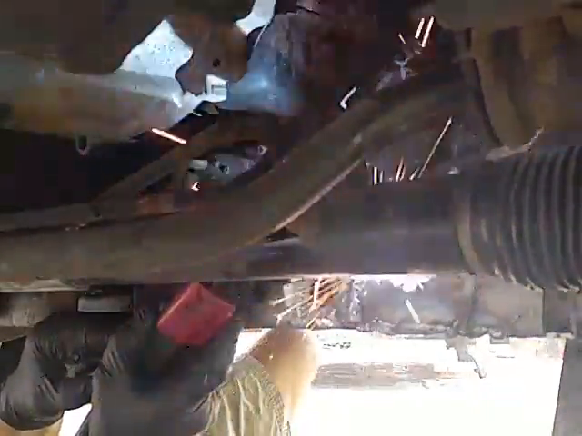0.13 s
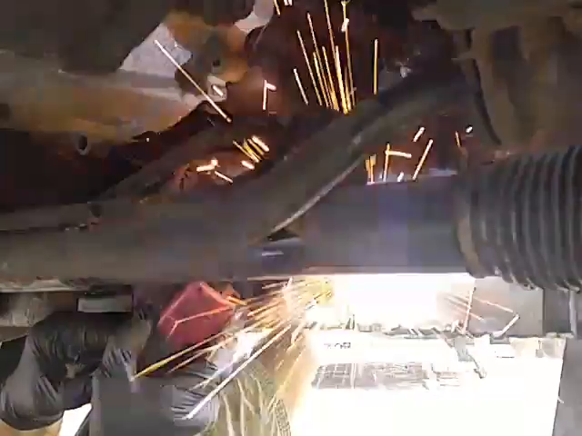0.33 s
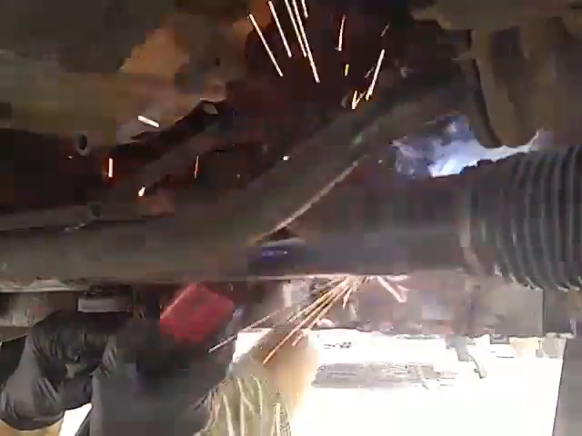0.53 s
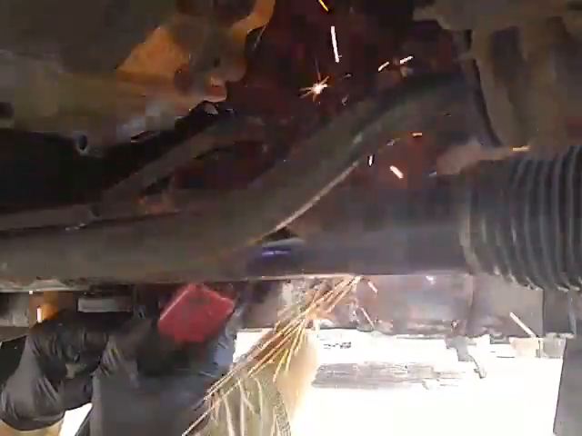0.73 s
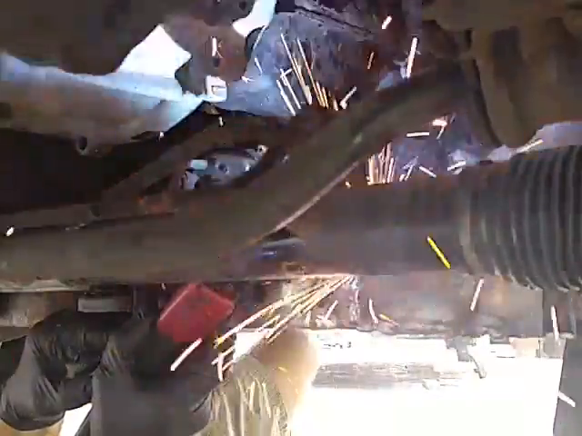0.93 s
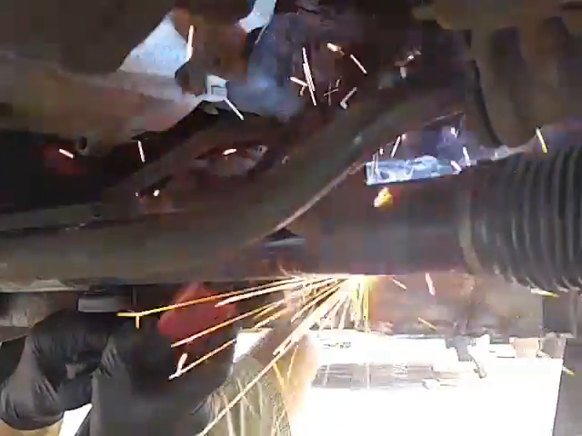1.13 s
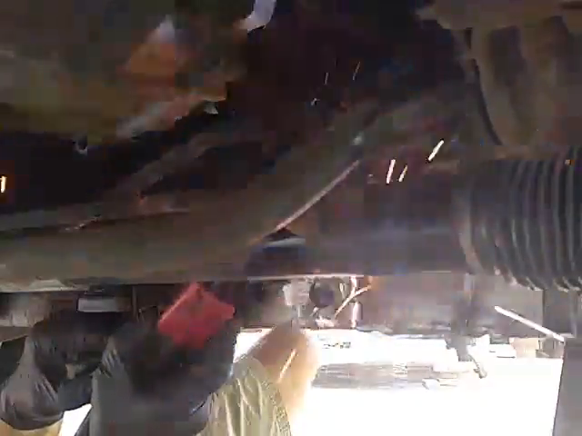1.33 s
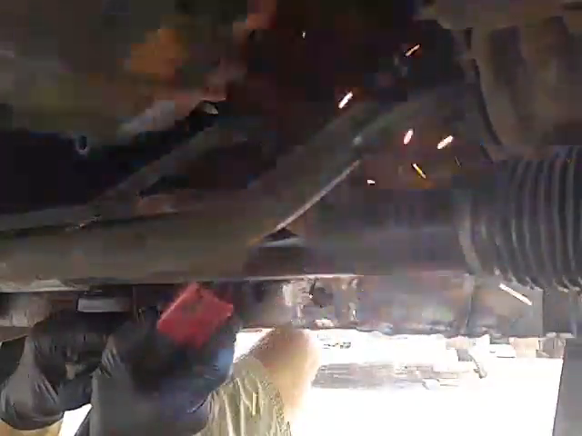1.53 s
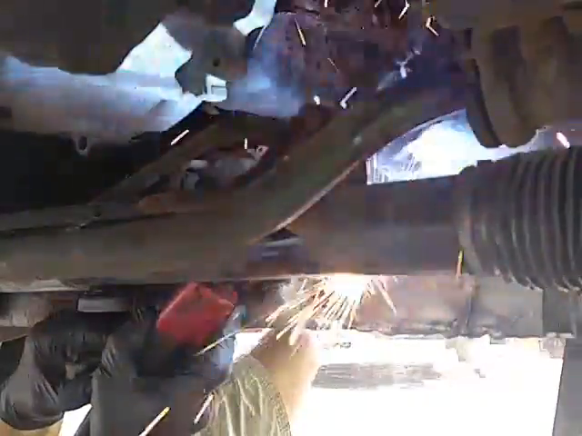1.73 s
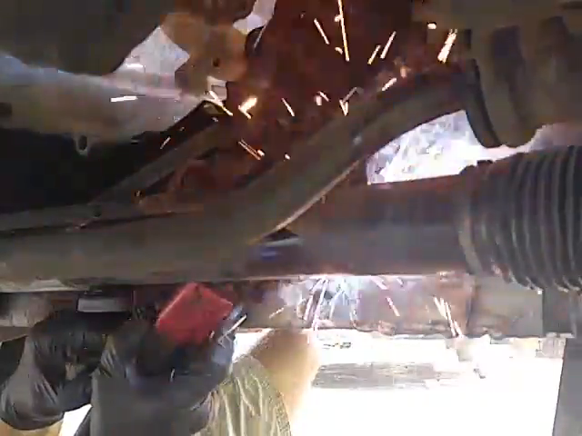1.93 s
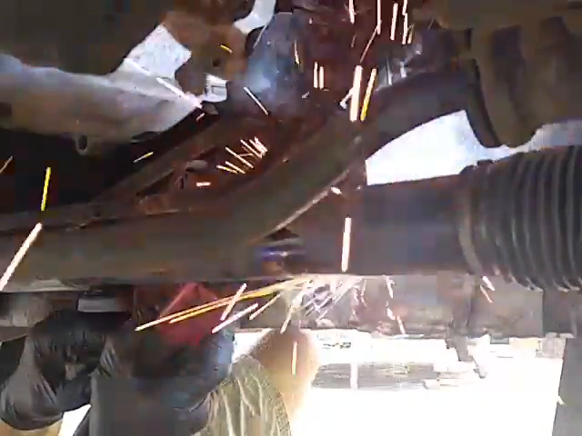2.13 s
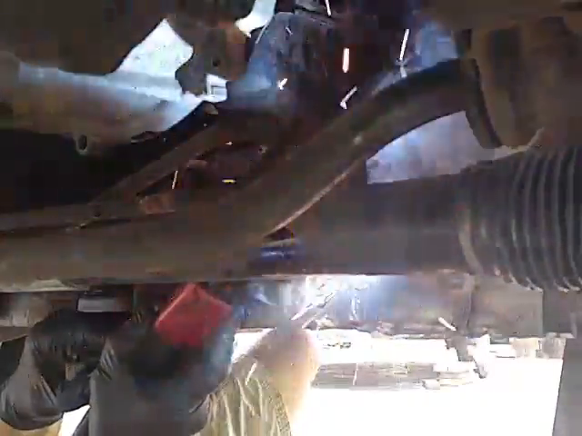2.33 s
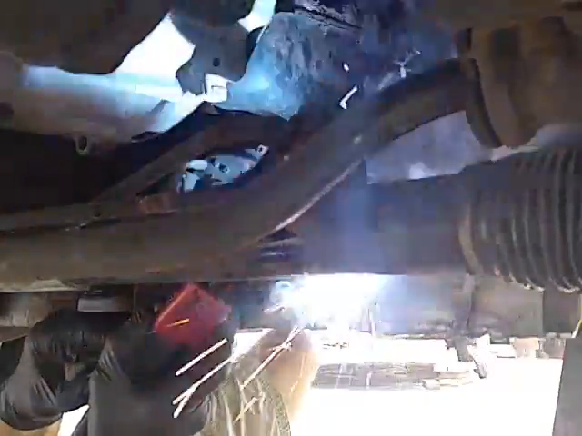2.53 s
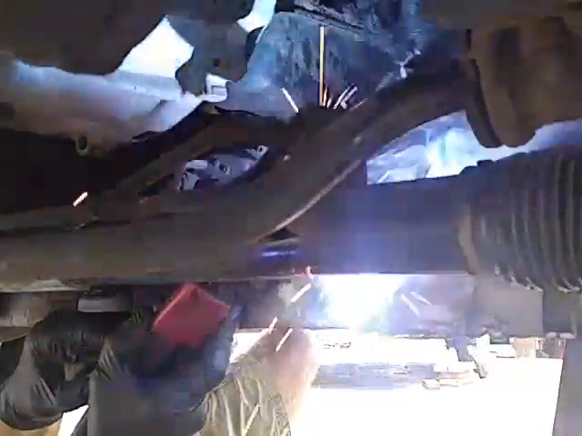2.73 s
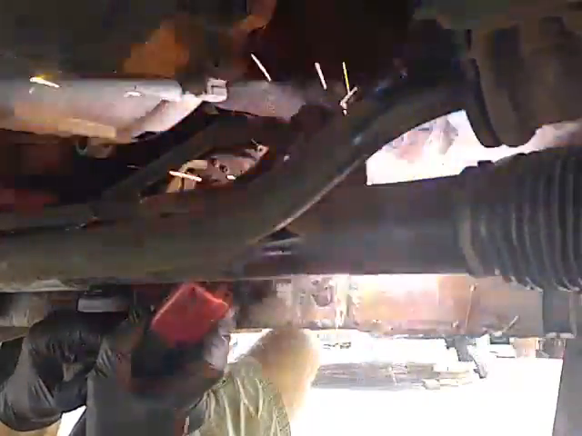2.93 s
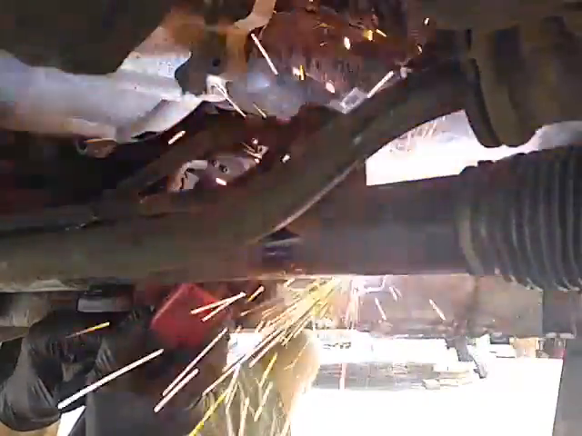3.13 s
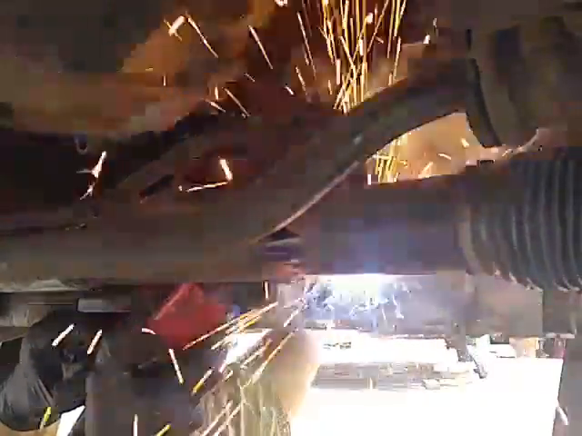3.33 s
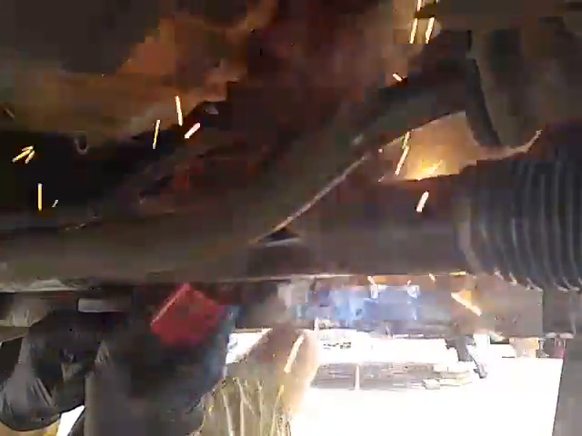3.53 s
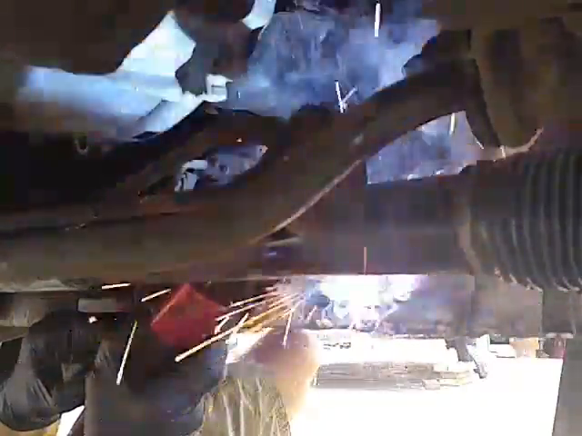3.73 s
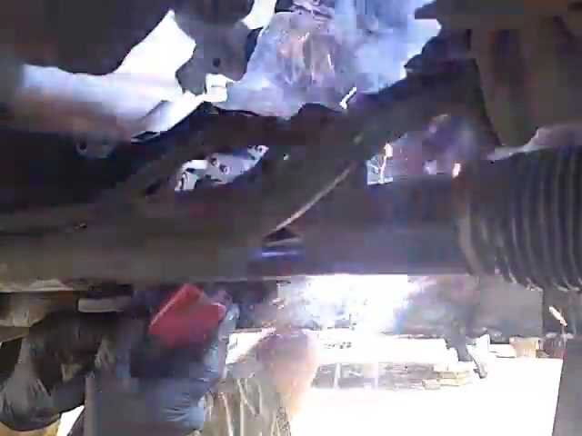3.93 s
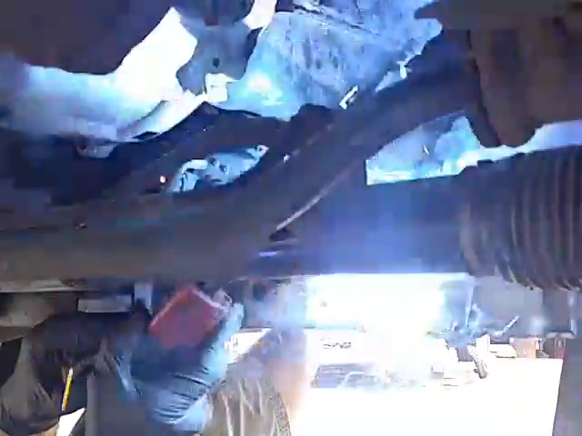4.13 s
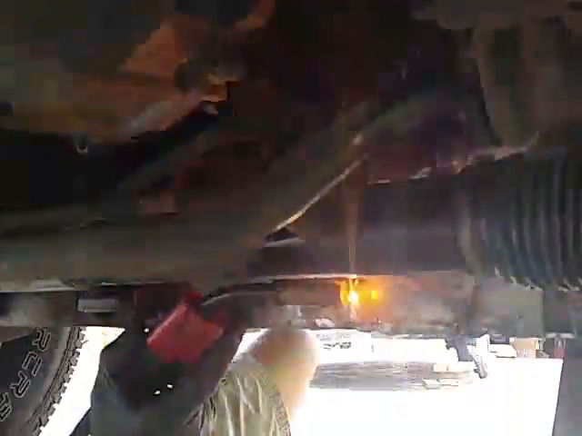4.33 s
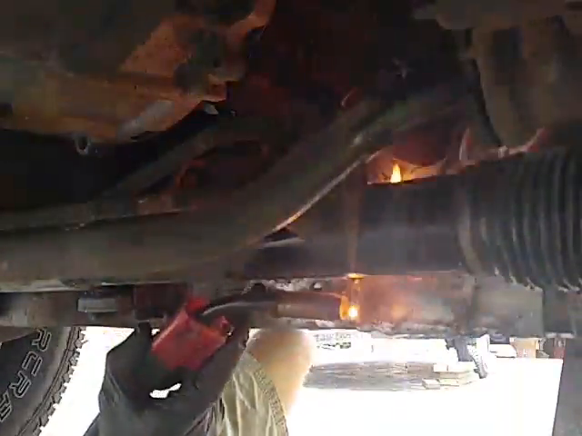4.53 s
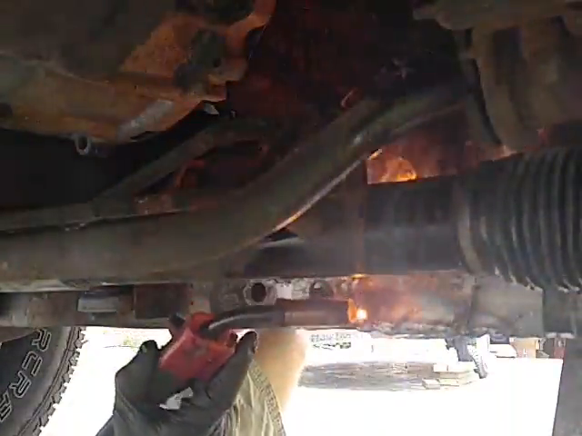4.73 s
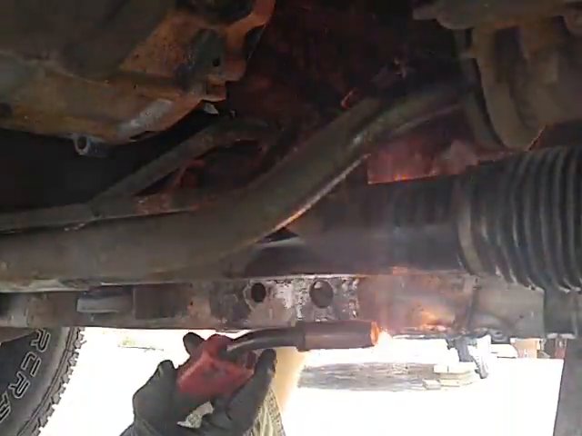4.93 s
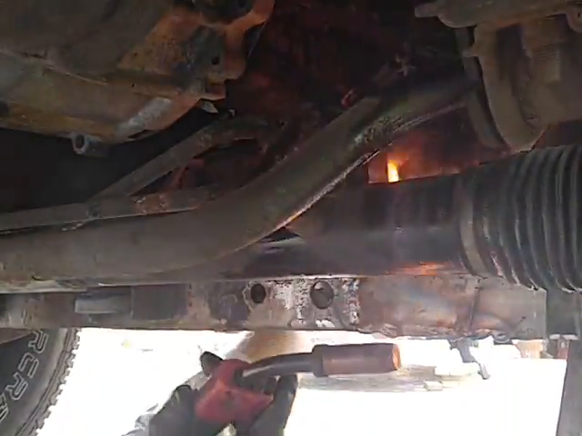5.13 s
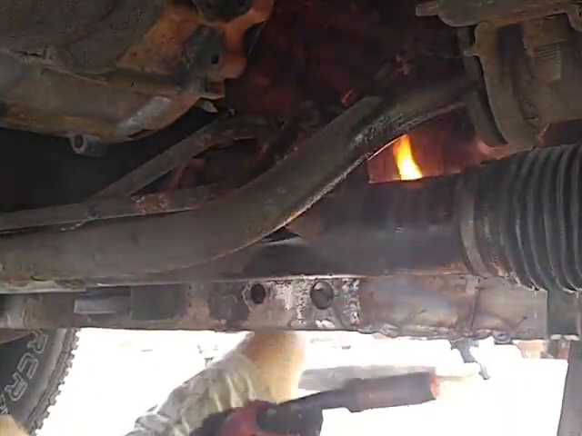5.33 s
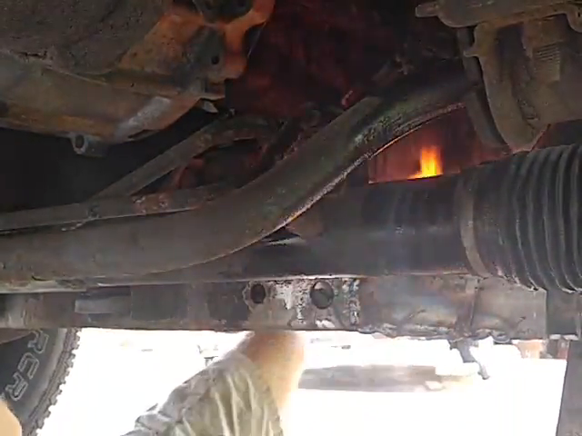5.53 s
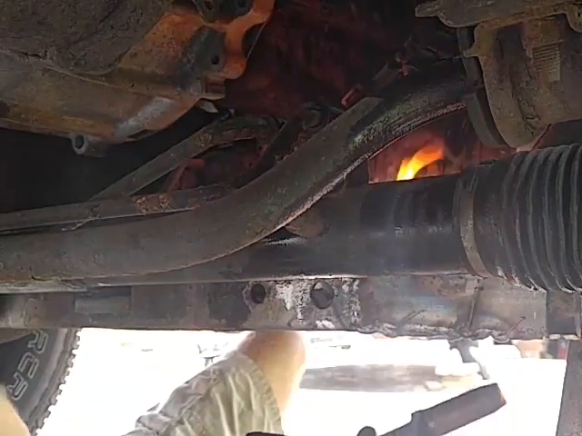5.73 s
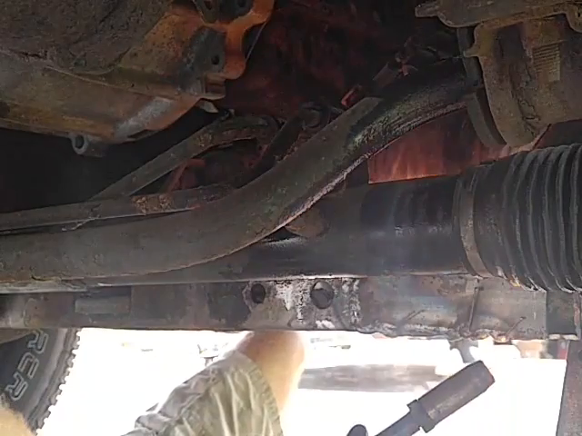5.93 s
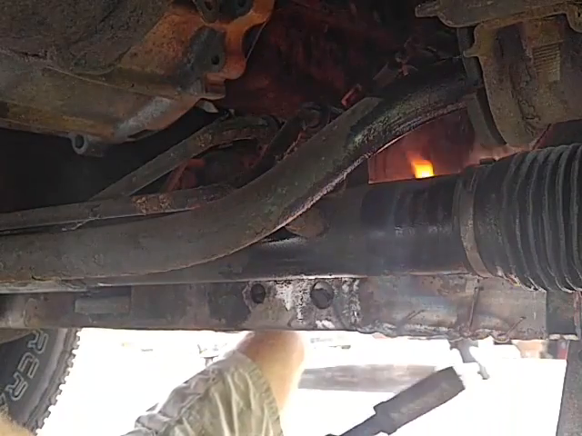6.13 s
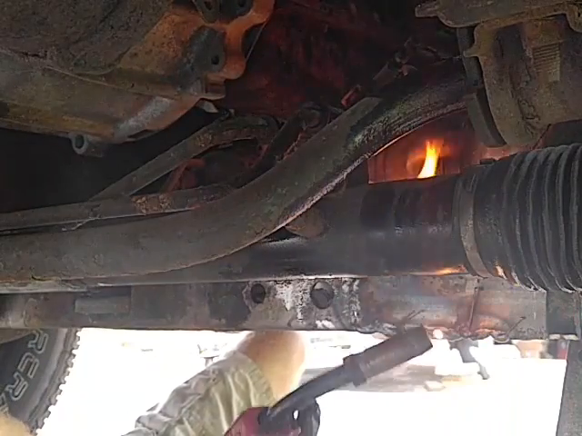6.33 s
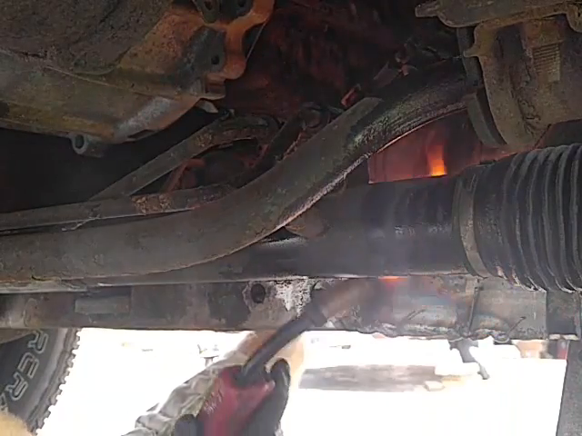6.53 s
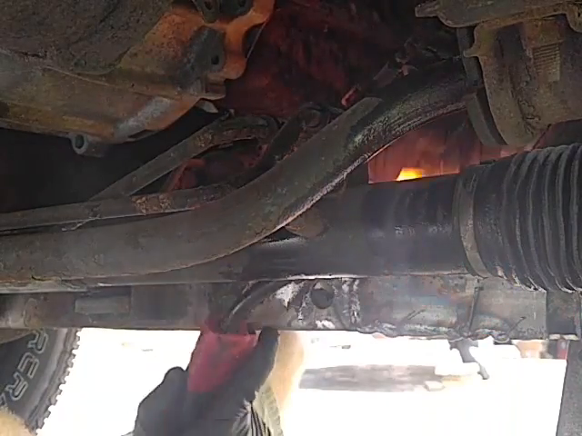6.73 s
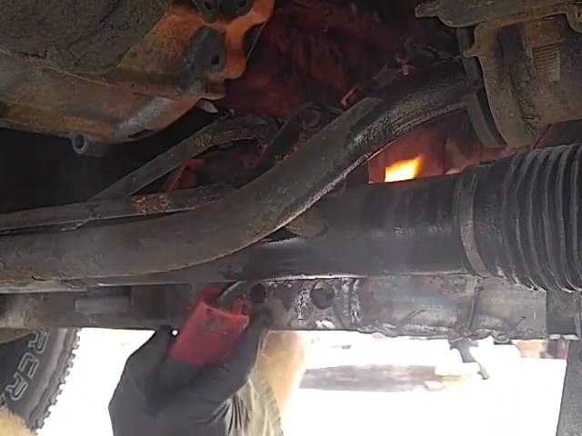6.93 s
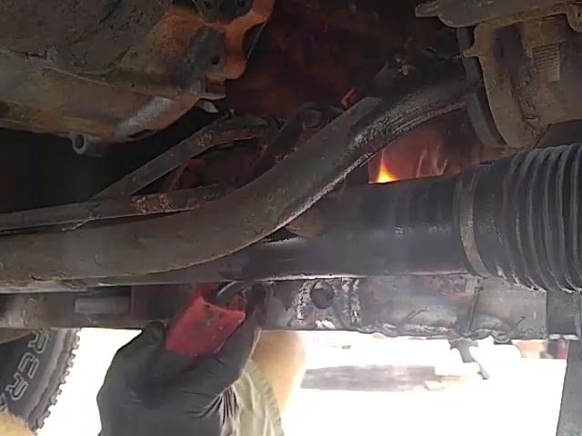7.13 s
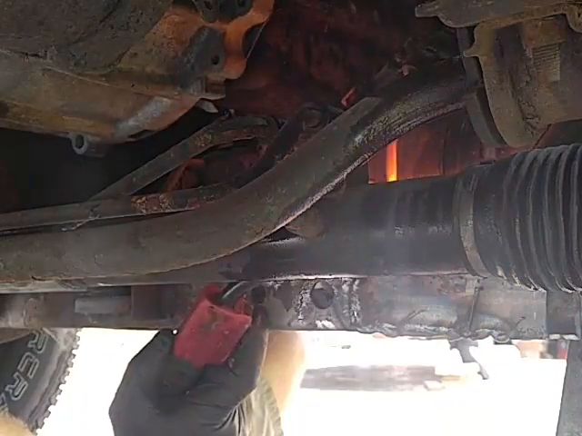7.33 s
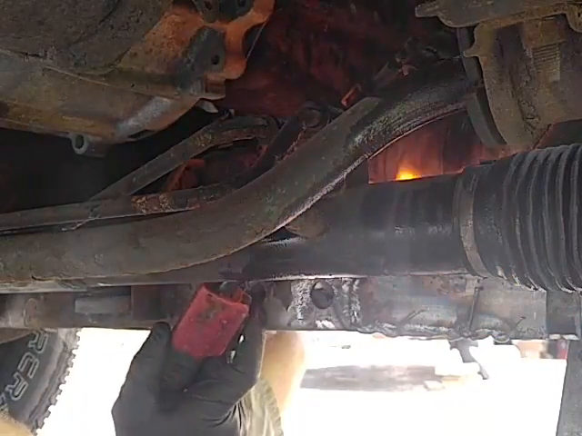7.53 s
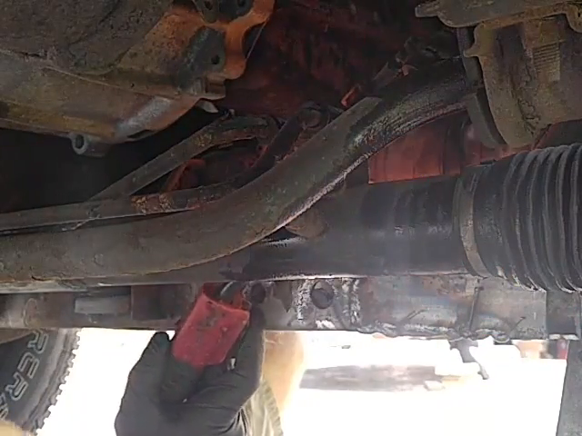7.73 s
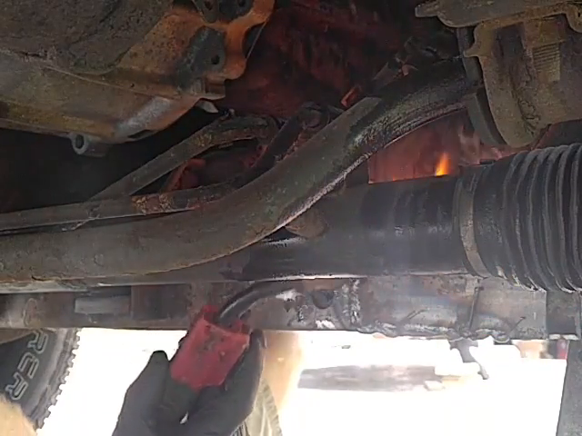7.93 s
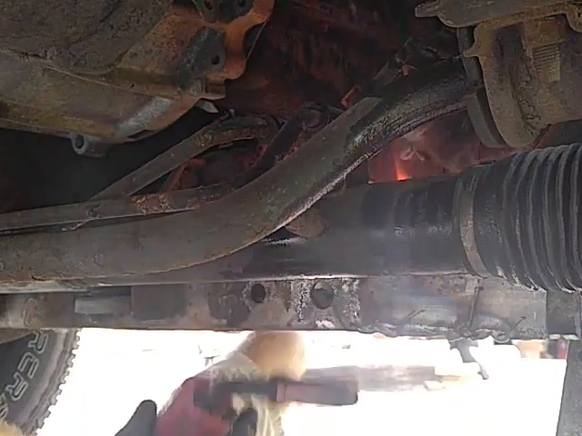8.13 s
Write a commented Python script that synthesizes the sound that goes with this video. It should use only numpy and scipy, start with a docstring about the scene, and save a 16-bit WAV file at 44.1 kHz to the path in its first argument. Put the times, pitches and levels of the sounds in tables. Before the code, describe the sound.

Loud, uneven welding comes first: bright cracks, hollow pops and bursts of sizzle, close to the microphone beneath a truck in a workshop. After roughly four seconds the welding stops and it becomes much quieter. A steady fan hum and soft low rumble remain, with occasional small clicks from the torch being moved and short, faint rustles of gloves and clothing.

```python
"""A MIG welder runs a four-second bead on a steel truck frame, heard from under the truck.
The wire shorts into the pool and blows free: even frying cracks when it feeds well, loud pops when
it stubs, a hiss when the arc burns open. Each crack is a bright snap, a hollow blast and a thump.
Then the arc stops; the welder's fan hums on over the rumble of the shop, while gloves and sleeves
rustle and the torch ticks as it is moved."""
import sys
import numpy as np
from scipy import signal
from scipy.fft import rfft, irfft
from scipy.io import wavfile
from scipy.ndimage import uniform_filter1d

SR = 44100
rng = np.random.default_rng(int(sys.argv[2]) if len(sys.argv) > 2 else 0)


def log_audio(samples):
    """Write samples as a 16-bit WAV file to the path given in sys.argv[1]."""
    # one column per channel
    frames = np.atleast_2d(samples).T
    # limit to full scale, then quantise
    limited = np.clip(frames, -1, 1)
    pcm = np.round(limited * 32767).astype(np.int16)
    wavfile.write(sys.argv[1], SR, pcm)


N = 360738
T = np.arange(N) / SR

# colour of the hollows of the frame: f/Hz, level/dB
HOLLOWS = [(100, -1.5), (250, 1), (400, -3), (520, -5.5), (700, -14.5), (880, -4.5), (1200, -9.5),
           (1500, 0), (1900, -8.5), (2800, -10), (5000, -6.5), (10000, -41)]


def amp(db):
    """Decibels to gain."""
    return 10 ** (np.asarray(db) / 20)


def unit_rms(x):
    """Scales to an rms of one."""
    return x / np.sqrt(np.mean(x ** 2) + 1e-20)


def curve(rows, column=1):
    """One column of a breakpoint curve, at every sample."""
    rows = np.array(rows)
    return np.interp(T, rows[:, 0], rows[:, column])


def spells(rows, attack_s, release_s):
    """Envelope of separate spells, each an attack, a hold and a release."""
    return sum(amp(db) * np.clip(np.minimum((T - s) / attack_s, (s + length - T) / release_s), 0, 1)
               for s, length, db in rows)


def add(mix, s, sound):
    """Mixes a sound in at time s."""
    part = mix[max(round(s * SR), 0):][:len(sound)]
    part += sound[:len(part)]


def drift(hz):
    """Random wander of rms one, with changes up to about hz."""
    knots = np.linspace(0, T[-1], int(2 * hz * T[-1]) + 2)
    return unit_rms(np.interp(T, knots, rng.standard_normal(len(knots))))


def colour(x, points, resonances=(), size=8192):
    """Minimum-phase EQ of unit energy from a spectrum and its resonances."""
    hz = np.fft.rfftfreq(size, 1 / SR)
    point_hz, point_db = np.transpose(points)
    gain = amp(np.interp(np.log(hz + 1), np.log(point_hz), point_db))
    for centre, width, lift_db in resonances:
        gain *= 1 + (amp(lift_db) - 1) / (1 + (2 * (hz - centre) / width) ** 2)
    log_gain = np.log(np.r_[gain, gain[-2:0:-1]])
    taps = np.fft.ifft(np.exp(np.conj(signal.hilbert(log_gain)))).real[:size // 2]
    return signal.oaconvolve(x, taps / np.linalg.norm(taps))[:N]


def scatter(size):
    """Dense reflections with a flat overall spectrum."""
    return unit_rms(irfft(np.exp(2j * np.pi * rng.random(size // 2 + 1)), size))


def grains(per_s, spread_db, hiss_db):
    """Tiny clicks of uneven size over a smooth hiss."""
    clicks = (rng.random(N) < per_s / SR) * rng.choice([-1, 1], N)
    sizes = amp(spread_db * np.minimum(rng.exponential(1, N), 4))
    return unit_rms(unit_rms(clicks * sizes) + amp(hiss_db) * rng.standard_normal(N))


def arc():
    """The wire shorts and blows free; snaps and sizzle ring the same steel, over blasts and thumps."""
    # separate pops of the stubbing wire: t/s, snap/dB, blast/dB, thump/dB
    pops = [(0.0097, -14.5, -21.5, -21), (0.086, -5, -16.5, -22), (0.1079, -2, -10.5, -19),
            (0.141, -4, -15.5, -18), (0.167, -4.5, -11, -18.5), (0.1865, -12.5, -20.5, -16),
            (0.2193, -8, -30.5, -44.5), (0.2407, -2.5, -8, -19.5), (0.2714, -4.5, -11, -14.5),
            (0.2951, -9, -24, -16), (0.3157, -4, -11.5, -24.5), (0.3907, -4.5, -14, -23.5),
            (0.486, -14.5, -48.5, -59.5), (0.5685, -3, -12.5, -16.5), (0.603, -3.5, -7.5, -21),
            (0.6419, -6.5, -16, -17.5), (0.6996, -4, -12, -16.5), (0.7674, -9, -37, -56),
            (0.7984, -7.5, -40.5, -50), (0.8581, -1.5, -12, -27), (0.906, -4, -18, -26.5),
            (0.9977, -7, -19.5, -36), (1.0286, 3, -7.5, -14), (1.064, -10, -16.5, -18.5),
            (1.1283, -13.5, -39, -53), (1.1692, -3, -18, -19), (1.1898, -8, -16, -21.5),
            (1.2487, -9, -24.5, -38), (1.2765, -5, -25, -23), (1.291, -8.5, -25, -50),
            (1.3327, -3, -16, -19.5), (1.39, -6, -27, -46), (1.447, -4, -8, -23.5),
            (1.4978, -10, -26, -27.5), (1.549, 0, -4, -25.5), (1.5915, -2.5, -8.5, -16),
            (1.6342, -13.5, -38, -57), (1.6599, -8, -33.5, -28.5), (1.7663, -13, -30.5, -52),
            (1.7915, -21, -45, -60), (1.8061, -10, -46, -55), (1.8315, -14, -50, -56.5),
            (1.8412, -5.5, -18, -16), (1.9395, -11, -46.5, -53.5), (2.0912, -6, -26.5, -18.5),
            (2.3171, -6, -32, -39.5), (2.3377, -5.5, -22, -15.5), (2.475, -6.5, -28, -43),
            (2.504, -8, -30, -25.5), (2.5188, -3.5, -18.5, -43), (2.5421, -6, -13.5, -28),
            (2.6148, -10.5, -30, -48), (2.7303, -9.5, -35, -60.5), (2.7833, -8.5, -34.5, -57.5),
            (2.8339, 3.5, -2.5, -14), (2.9268, -6, -34.5, -49), (2.9834, -4.5, -14, -23),
            (3.0069, -13, -28.5, -46.5), (3.0322, 1, -8.5, -12.5), (3.1084, -4.5, -13, -17),
            (3.1319, 1, -9, -36), (3.2011, 1, -5, -17.5), (3.24, -18, -24.5, -51.5),
            (3.3772, -6, -26.5, -43.5), (3.446, -3.5, -11, -18), (3.5427, -10.5, -12, -43.5),
            (3.5936, -3.5, -9.5, -21), (3.6232, -6.5, -13.5, -33.5), (3.7064, -3.5, -12.5, -32),
            (3.7446, -11, -31.5, -52.5), (3.8951, -4, -23, -43), (3.9653, 0, -9, -17)]
    # colour of the snap: f/Hz, level/dB
    snap_eq = [(300, -35), (1000, -10.5), (2200, -12), (3500, -14), (4700, -9), (5700, -6), (6400, -1.5),
               (8500, -2.5), (10300, -1), (11300, -4.5), (13500, -1.5), (15800, -7.5)]
    # resonances of the gas nozzle and the steel around the arc: f/Hz, width/Hz, lift/dB
    steel_modes = [(2157, 140, 5.5), (3000, 290, 6.5), (3890, 85, 7), (4200, 93, 2.5), (4850, 63, 8),
                   (5120, 210, 6), (6295, 190, 6), (6560, 70, 0), (7310, 120, 4), (8140, 260, 5),
                   (8700, 63, 3.5), (8844, 120, 5.5), (9250, 38, 6.5), (10140, 450, 6.5), (10940, 81, 7),
                   (11830, 150, 6)]
    cracks = list(pops) + frying()
    hiss = sizzle(cracks)
    sputter = amp(-11) * colour(hiss, HOLLOWS)
    crackle = colour(snaps(cracks) + hiss, snap_eq, steel_modes)
    return workshop(crackle + sputter + blasts(cracks)) + thumps(cracks)


def snaps(cracks, shared=0.63, front_hz=7600, near_t60=0.038, tail_t60=0.091, size=4096):
    """Each snap takes the same paths among the steel parts, altered a little as the pool moves."""
    t, out = np.arange(size) / SR, np.zeros(N)
    front, near, tail = rng.standard_normal((len(cracks) + 1, 3, size)).swapaxes(0, 1)
    # a sharp front rings the nozzle; bright near echoes follow, then a duller tail
    front = unit_rms(signal.lfilter(*signal.iirpeak(front_hz, Q=2, fs=SR), front))
    front *= amp(2) * np.exp(-t / 0.001)
    tail = signal.lfilter(*signal.butter(2, 10500, fs=SR), tail)
    bursts = front + near * amp(-60 * t / near_t60) + tail * amp(-11 - 60 * t / tail_t60)
    # the first burst gives the shared paths, levelled to favour no broad band
    spectra = rfft(bursts)
    power = abs(spectra) ** 2
    paths = irfft(spectra[0] * np.sqrt(power.mean(axis=0) / uniform_filter1d(power[0], size=30)))
    paths *= np.minimum(2 * (1 - t / t[-1]), 1) ** 2  # the last echoes fade to nothing
    for (s, db, _, _), own in zip(cracks, bursts[1:]):
        add(out, s, amp(db) * (np.sqrt(shared) * paths + np.sqrt(1 - shared) * own))
    return out


def blasts(cracks, start_hz=1450, end_hz=420, glide_s=0.002577, knock_s=0.0033, size=4096):
    """The burst of metal vapour gives a knock that falls in pitch and echoes in the frame's hollows."""
    t, knocks, echoes = np.arange(size) / SR, np.zeros(N), np.zeros(N)
    fade = amp(-60 * t / 0.02) + amp(-19 - 60 * t / 0.14)  # short ring, quieter long tail
    for (s, _, db, _), chance in zip(cracks, rng.standard_normal((len(cracks), 2))):
        pitch, stretch = np.exp(0.13 * chance)
        hz = pitch * (end_hz + (start_hz - end_hz) * np.exp(-t / (glide_s * stretch)))
        age = 2 * t / (knock_s * stretch)
        envelope = 2 * age * np.exp(-age)
        add(knocks, s, -amp(db + 5) * envelope * np.sin(2 * np.pi * np.cumsum(hz) / SR))
        add(echoes, s, amp(db) * rng.standard_normal(size) * fade)
    return knocks + colour(echoes, HOLLOWS)


def thumps(cracks, corner_hz=50, rise_s=0.00035, push_s=0.0044, lag_s=0.0011, size=4096):
    """Big pops push a wave of pressure; the microphone's bass cut makes it swing a few times."""
    t, out = np.arange(size) / SR, np.zeros(N)
    bass_cut = signal.butter(5, corner_hz, "high", fs=SR, output="sos")
    for (s, _, _, db), chance in zip(cracks, rng.standard_normal(len(cracks))):
        fall_s = push_s * np.exp(0.18 * chance)
        push = (1 - np.exp(-t / rise_s)) * np.exp(-t / fall_s)
        add(out, s + lag_s, -amp(db - 5) * unit_rms(signal.sosfilt(bass_cut, push)))
    return out


def frying(jitter=0.05, spread_db=0.66, fall_db=1, typical_db=-9, growth=1.65):
    """Well-fed wire shorts at a nearly even pace, each run dying down a little; rows like the pops."""
    # runs of frying: t/s, number of cracks, rate/Hz, snap/dB
    runs = [(0.0271, 2, 57, -9.5), (0.3337, 2, 110, -13.5), (0.5231, 2, 78, -10.5), (0.816, 3, 108, -11),
            (0.937, 4, 101, -6.5), (1.0873, 2, 89, -8.5), (1.1995, 2, 102, -10), (1.344, 2, 88, -7.5),
            (1.4766, 4, 98, -9), (1.669, 6, 126, -17), (1.7231, 2, 96, -14), (1.8751, 2, 84, -10.5),
            (1.9599, 8, 119, -12.5), (2.03, 5, 81, -7), (2.104, 2, 78, -10), (2.126, 6, 109, -11),
            (2.179, 4, 47, -8), (2.264, 4, 103, -10.5), (2.358, 4, 80, -9), (2.4013, 8, 146, -9),
            (2.564, 3, 86, -6), (2.9612, 3, 90, -7.5), (3.1581, 2, 100, -12.5), (3.313, 4, 105, -10.5),
            (3.4725, 4, 102, -9), (3.6514, 2, 105, -5.5), (3.8408, 3, 134, -7)]
    cracks = []
    for start, count, rate, run_db in runs:
        count = round(count)
        for k, (late, strong, deep) in enumerate(rng.standard_normal((count, 3))):
            s = start + (k + late * jitter) / rate
            snap_db = run_db - fall_db * ((k + 0.5) / count - 0.5) + spread_db * strong
            # blast and thump grow faster than the snap
            body_db = growth * (snap_db - typical_db + spread_db * deep)
            cracks.append((s, snap_db, body_db - 29.5, body_db - 38.5))
    return cracks


def sizzle(cracks, arc_off_s=4.02, short_s=0.003, floor_db=-43):
    """The burning arc hisses; it goes out while the wire is shorted before each crack."""
    # spells in which the arc burns open: t/s, length/s, level/dB
    open_arc = [(0.415, 0.14, -26.5), (0.915, 0.063, -22), (1.148, 0.025, -21.5), (1.305, 0.055, -22.5),
                (1.46, 0.033, -11), (1.66, 0.31, -26), (2.63, 0.052, -32.5), (2.688, 0.09, -20.5),
                (2.872, .15, -18), (3.245, .085, -33), (3.452, 0.036, -14), (3.632, .03, -15),
                (3.785, .075, -23.5)]
    lit = 1.0 * (T < arc_off_s)
    for s, *_ in cracks:
        lit[max(round((s - short_s) * SR), 0):round(s * SR)] = 0
    flares = spells(open_arc, attack_s=0.012, release_s=0.004)  # builds up, then the wire cuts it off
    envelope = uniform_filter1d(lit, size=60) * (flares + amp(floor_db))
    flicker = amp(-2 + 3 * drift(hz=87.5))
    return envelope * flicker * grains(per_s=4000, spread_db=1, hiss_db=-7)


def workshop(x, wet_db=-26, t60=0.85, air_hz=8000, size=32768):
    """Adds a faint, late and dull return from the room beyond the truck."""
    t = np.arange(size) / SR
    tail = scatter(size) * amp(-60 * t / t60) * (1 - np.exp(-t / 0.015))
    tail = signal.lfilter(*signal.butter(2, air_hz, fs=SR), tail / np.linalg.norm(tail))
    return x + amp(wet_db) * signal.oaconvolve(x, tail)[:N]


def fan(waver=0.00082, flutter_db=0.4):
    """The welder's cooling fan: blade tones that waver slightly, in the rush of their own air."""
    # the fan's pitch sags under the arc's load; its hum and air are ducked until the arc stops:
    # t/s, blade rate/Hz, level/dB
    running = [(0, 243, -6.5), (1.6, 249.7, -6.5), (2.7, 242.7, -4.5), (4.02, 239.2, -5.5),
               (4.17, 247.3, 0.5), (4.42, 247.9, 1.5), (5.9, 250, 1), (7.2, 250.7, 1), (8.18, 252, 2)]
    # blade tones: multiple of the blade rate, level/dB
    harmonics = [(1, -54.5), (2, -66.5), (3, -45), (4, -51), (5, -64), (6, -61)]
    # gain on the lowest tone, easing down from the end of the bead: t/s, level/dB
    low_tone_ride = [(3.8, 10), (4.15, 4.5), (5.9, 2), (6.6, -5)]
    # colour of the rushing air: f/Hz, level/dB
    air_eq = [(100, -9.5), (250, 7), (350, -1), (450, -8.5), (540, -7.5), (650, 0.5), (850, 4), (1100, 2),
              (1400, -3), (2200, -9), (4000, -19.5), (7500, -20), (9200, -33), (15500, -28)]
    cycles = np.cumsum(curve(running) * (1 + waver * drift(hz=4.5))) / SR
    tones = []
    for k, db in harmonics:
        peak = np.sqrt(2) * amp(db + flutter_db * drift(hz=5))
        tones.append(peak * np.sin(2 * np.pi * (k * cycles + rng.random())))
    hum = amp(curve(low_tone_ride)) * tones[0] + sum(tones[1:])
    air = amp(-47) * colour(rng.standard_normal(N), air_eq)
    return amp(curve(running, column=2)) * (hum + air)


def rumble():
    """Steady low noise of the shop, and a soft low flutter that swells over it."""
    # colour of the shop's rumble: f/Hz, level/dB
    shop_eq = [(20, -35.5), (35, -32), (50, -12), (69, 6), (84, -7), (135, -11.5), (175, -9), (400, -49.5)]
    # the flutter, loudest as the torch comes back to the frame: t/s, level/dB
    flutter_ride = [(4.0, -51.5), (5.3, -45.5), (6.2, -44.5), (6.45, -40), (6.75, -33.5), (6.95, -40.5),
                    (7.6, -41.5), (8.18, -39.5)]
    # colour of the flutter: f/Hz, level/dB
    flutter_eq = [(35, -52.5), (75, 5.5), (135, 9), (200, -5), (450, -50.5)]
    steady = amp(-43) * colour(rng.standard_normal(N), shop_eq)
    flutter = amp(curve(flutter_ride)) * colour(rng.standard_normal(N), flutter_eq)
    return steady + flutter


def handling():
    """Rustle and ticks share the cloth's bright colour; the rings sound beneath, in a short reverb."""
    # colour of the rubbing cloth: f/Hz, level/dB
    cloth_eq = [(500, -5), (1500, -10), (3000, 1.5), (5000, -1.5), (7300, 7.5), (9000, 2.5), (10000, 6.5),
                (12000, 0.5), (15500, -3.5)]
    cloth = rustle()
    clicks, rings = ticks()
    return workshop(colour(cloth + clicks, cloth_eq) + amp(-5) * rings, wet_db=-25.5, t60=0.35)


def ticks(body_hz=(800, 3200), size=8192):
    """Torch, cable and cooling weld tick; soft knocks ring low, with less treble and more body."""
    # the ticks: t/s, level/dB, ring f/Hz, time to fall 60 dB/s
    hits = [(4.083, -37.5, 6470, 0.071), (4.115, -33, 5600, 0.056), (4.518, -38, 860, 0.075),
            (4.925, -44, 3080, 0.054), (5.178, -37.5, 7000, 0.054), (5.317, -37, 10000, 0.055),
            (5.439, -42, 7500, 0.046), (5.738, -42, 7000, 0.065), (5.848, -38, 3300, .055),
            (6.511, -35, 10200, 0.071), (6.583, -33.5, 5640, 0.075), (6.638, -43, 7000, 0.046),
            (6.735, -31, 3740, 0.047), (7.048, -32.5, 7340, 0.059), (7.066, -39, 9500, .05),
            (7.092, -28.5, 6270, 0.046), (7.253, -44, 7960, 0.057), (7.289, -42.5, 4540, .04),
            (7.369, -46, 10000, .06), (7.609, -41.5, 7300, 0.024), (7.776, -37, 960, .12),
            (7.788, -36, 9900, 0.062), (7.816, -38, 3170, 0.04)]
    t, clicks, rings = np.arange(size) / SR, np.zeros(N), np.zeros(N)
    transient = 1 + amp(7) * np.exp(-t / 0.00016)
    for s, db, hz, t60 in hits:
        fade = amp(db - 60 * t / t60)
        hardness, softness = min(hz / 6000, 1), max(1 - hz / 7500, 0)
        ring = unit_rms(signal.lfilter(*signal.iirpeak(hz, Q=7, fs=SR), scatter(size)))
        add(clicks, s, hardness ** 2 * fade * transient * scatter(size))
        body = unit_rms(signal.lfilter(*signal.butter(1, body_hz, "band", fs=SR), scatter(size)))
        add(rings, s, fade * (ring / np.sqrt(hardness) + amp(-1) * softness * body))
    return clicks, rings


def rustle(fidget_db=-62):
    """Cloth catches and slips in clumps of grains, with faint rubbing between strokes."""
    # strokes of gloves and sleeves: t/s, length/s, level/dB
    strokes = [(5.19, 0.19, -49.5), (5.55, 0.21, -45), (5.94, 0.13, -53), (6.31, 0.24, -50),
               (6.69, 0.25, -43.5), (6.92, 0.1, -57), (7.71, 0.15, -48), (8.0, 0.22, -57.5)]
    envelope = spells(strokes, attack_s=0.081, release_s=0.058) + amp(fidget_db)
    clumps = amp(3.9 * drift(hz=75.1))
    return envelope * clumps * grains(per_s=300, spread_db=3.5, hiss_db=2.5)


def scene():
    """The arc and the handling over a bed of fan and rumble, in mono."""
    return (arc() + fan() + rumble() + handling())[None]


def record(dry, ceiling=0.74, edge_hz=16050):
    """The loudest pops overload the microphone; a steep low-pass trims the top."""
    squashed = dry / (1 + (dry / ceiling) ** 6) ** (1 / 6)
    low_pass = signal.firwin(401, edge_hz, window=("kaiser", 8), fs=SR)
    return signal.oaconvolve(squashed, low_pass[None], "same")


dry = scene()
out = record(dry)
log_audio(out)
```